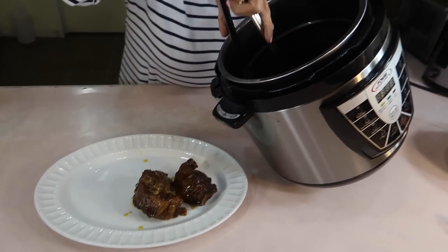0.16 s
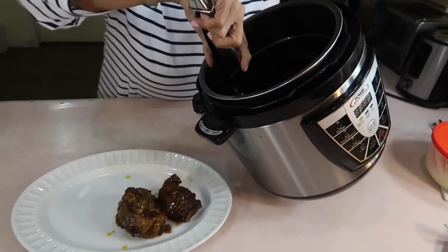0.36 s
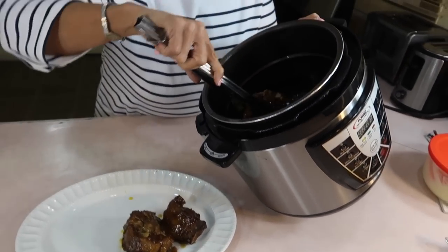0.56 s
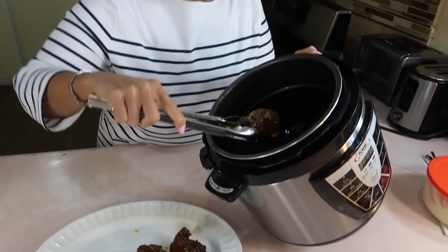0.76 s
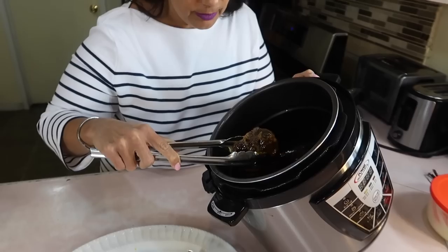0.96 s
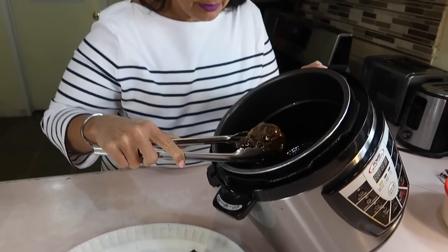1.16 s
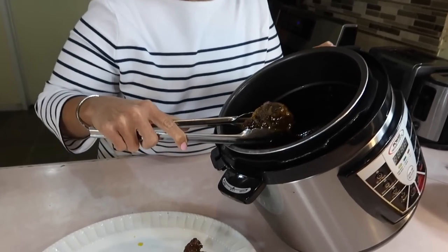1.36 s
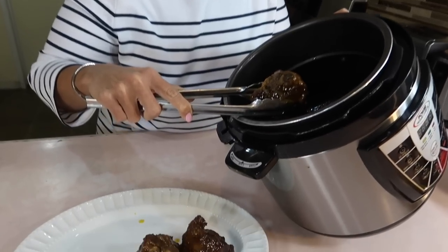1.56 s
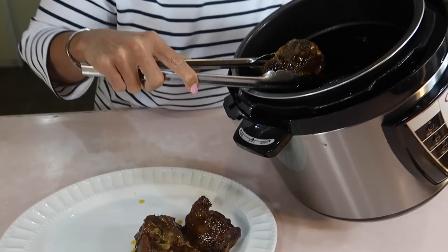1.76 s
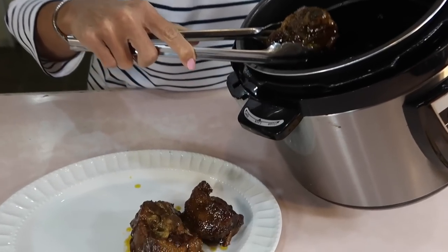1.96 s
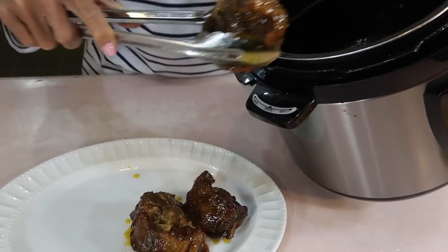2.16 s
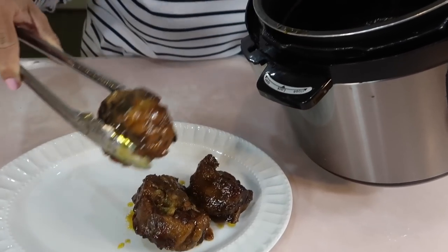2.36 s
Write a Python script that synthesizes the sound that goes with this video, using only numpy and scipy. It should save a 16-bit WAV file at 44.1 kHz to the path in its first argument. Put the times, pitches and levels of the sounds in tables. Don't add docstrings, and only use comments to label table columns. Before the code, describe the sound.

Metal tongs knock a steel cooking pot, a soft load thuds inside, then sauce drips faintly

```python
import sys
import numpy as np
from scipy import signal
from scipy.fft import rfft, irfft
from scipy.io import wavfile

SR = 44100
rng = np.random.default_rng(int(sys.argv[2]) if len(sys.argv) > 2 else 0)


def master_out(mix):
    frames = np.transpose(np.atleast_2d(mix))
    ceiling = np.clip(frames, -1, 1)
    pcm = np.round(ceiling * 32767).astype(np.int16)
    wavfile.write(sys.argv[1], SR, pcm)


def amplitude_ratio(level_db):
    exponent = np.asarray(level_db, float) / 20
    return 10 ** exponent


N = 105840

# frequency in Hz, level in dB per Hz.
RIM_CRACK = [(300, -7), (1200, -2.5), (2330, -2.5), (6470, -1), (9000, -12.5), (12500, -15), (15500, -35)]


def rms_one(x):
    return x / np.sqrt(np.mean(x ** 2) + 1e-20)


def dying(t60, size):
    return amplitude_ratio(-60 * np.arange(size) / SR / t60)


def swelling(t, rise_s):
    return 1 - np.exp(-t / rise_s)


def filtered(x, order, hz, kind="low"):
    return signal.sosfilt(signal.butter(order, hz, kind, fs=SR, output="sos"), x)


def coloured(x, spectrum):
    hz, db = np.transpose(spectrum)
    at = np.log(np.arange(len(x) // 2 + 1) * SR / len(x) + 1)
    return irfft(rfft(x) * amplitude_ratio(np.interp(at, np.log(hz), db)), len(x))


def add(out, sound, s):
    i = int(s * SR)
    out[i:i + len(sound)] += sound[:len(out) - i]


def pot_rings(modes, contact_s):
    rattle_depth, rattle_rate = 0.75, 0.05
    t = np.arange(SR // 2) / SR
    rings = np.zeros(len(t))
    for k, (hz, db, t60) in enumerate(modes):
        noise = rng.standard_normal(2 * len(t))
        rattle = rms_one(filtered(noise, 2, rattle_rate * hz)[len(t):])
        tone = (-1) ** k * np.sin(2 * np.pi * hz * t) * dying(t60, len(t))
        swell = swelling(t, contact_s * 500 / hz) ** 2
        rings += amplitude_ratio(db) * tone * (1 + rattle_depth * rattle) * swell
    return rings


def contact_crack(colour, crack_t60):
    spark_db, spark_t60_s, spark_hz = -37, 0.0065, 8000
    t = np.arange(SR // 2) / SR
    burst = rms_one(coloured(rng.standard_normal(len(t)), colour))
    burst = burst * dying(crack_t60, len(t)) * swelling(t, 0.00079)
    spark = filtered(rng.standard_normal(len(t)), 2, spark_hz, "high")
    duller_db = colour[-2][1] - RIM_CRACK[-2][1]
    return burst + amplitude_ratio(spark_db + duller_db) * spark * dying(spark_t60_s, len(t))


def knocks():
    # start in seconds, peak level in dB.
    blows = [
        (0.1606, -6.5),
        (0.3661, -10),
        (1.298, -11),
    ]
    # ring level in dB, contact time in seconds,
    # crack level in dB, crack's 60 dB decay in seconds, room level in dB.
    contacts = [(-10, 0.0068, -7.5, 0.033, -7.5), (-15.5, 0.0028, -10, 0.057, -9.5),
                (-11, 0.0022, -8.5, 0.042, -8)]
    # frequency in Hz, level in dB, 60 dB decay in seconds.
    rim_modes = [(338, -2.5, 0.083), (661.4, -1, 0.14), (1045, -11, 0.11), (1161, -14, .13),
                 (1385, -3.5, 0.14), (1880, -15, 0.15), (1978, -17, 0.3), (2095, -2.5, 0.054),
                 (2580, -14, 0.13), (2732, 0, 0.067), (3150, -9, 0.055), (3760, -16.5, 0.052),
                 (4220, -8, 0.055), (4960, -17.5, 0.14), (5600, -10, 0.038), (6500, 4.5, 0.025),
                 (7300, -7.5, 0.031)]
    thud_modes = [(349, 4, 0.1), (623, -14.5, 0.55), (680, 0, 0.12), (555, 0.5, 0.09), (825, -2, 0.039)]
    wall_modes = [(235, 3, 0.081), (294, -0.5, 0.088), (336, 0, 0.12), (598, -10.5, 0.13), (656.6, -7, 0.2),
                  (730, -19, 0.045), (1050, -10.5, 0.17), (1460, -11.5, 0.11), (1682, -11, 0.092),
                  (1949, -18, 0.17), (2097, -6, 0.063), (2320, -10, 0.12), (2360, -16, 0.2),
                  (2770, -4.5, 0.049), (3110, 3.5, 0.02), (3440, -9, 0.024), (4220, -34, 0.17)]
    # frequency in Hz, level in dB per Hz.
    thud_crack = [(200, -3), (600, -3.5), (1130, -14.5), (3000, -21), (12500, -41.5), (15500, -55)]
    wall_crack = [(300, -15), (900, -6.5), (1280, -17.5), (1630, -6.5), (3280, -8), (4390, -13.5),
                  (10500, -24), (14500, -47)]
    ring_to_room = 0.38
    bodies = [(rim_modes, RIM_CRACK), (thud_modes, thud_crack), (wall_modes, wall_crack)]
    direct, to_room = np.zeros(N), np.zeros(N)
    for (s, peak_db), (modes, colour), contact in zip(blows, bodies, contacts):
        ring_db, contact_s, crack_db, crack_t60, room_db = contact
        rings = amplitude_ratio(peak_db + ring_db) * pot_rings(modes, contact_s)
        crack = amplitude_ratio(peak_db + crack_db) * contact_crack(colour, crack_t60)
        add(direct, rings + crack, s)
        add(to_room, amplitude_ratio(room_db) * (ring_to_room * rings + crack), s)
    return direct, to_room


def settles():
    # start in seconds, frequency in Hz, level in dB, 60 dB decay in seconds.
    bumps = [
        (0.174, 80.6, -30.5, 0.33),
        (0.3697, 215, -1.5, 0.037),
        (0.389, 185, -17.5, 0.04),
        (0.419, 190.6, -24, 0.084),
        (0.437, 238, -27.5, 0.1),
    ]
    landing_s, floor_hz = 0.0037, 107
    out, t = np.zeros(N), np.arange(SR // 5) / SR
    for s, hz, db, t60 in bumps:
        bump = np.sin(2 * np.pi * hz * t) * dying(t60, len(t)) * swelling(t, landing_s)
        add(out, amplitude_ratio(db) * bump, s)
    return filtered(out, 2, floor_hz, "high")


def drops():
    # start in seconds, frequency in Hz,
    # level in dB, 60 dB decay in seconds.
    drop_rows = [(0.337, 470, -32, 0.034), (.661, 2200, -42, 0.018), (.885, 680, -42, 0.035),
                 (0.917, 4360, -47, 0.033), (0.939, 2990, -40, 0.04), (.949, 6340, -49, 0.042),
                 (1.044, 1600, -35, 0.04), (1.05, 1150, -38, 0.071), (1.059, 2905, -41.5, 0.085),
                 (1.064, 1243, -36.5, 0.048), (1.068, 5300, -51, 0.098), (1.085, 2320, -44, 0.05),
                 (1.085, 3400, -48, .04), (1.046, 2290, -44, 0.044), (1.047, 3280, -47, 0.053),
                 (1.149, 3000, -46, .04), (1.09, 1116, -40, 0.086), (1.098, 1305, -44.5, 0.086),
                 (1.115, 8000, -46, 0.053), (1.122, 3940, -43, 0.039), (1.122, 4800, -45, 0.041),
                 (1.149, 1740, -37.5, 0.032), (1.148, 2360, -37.5, 0.088), (1.170, 7670, -46, 0.036),
                 (1.172, 2080, -46, 0.06), (1.200, 2170, -48, 0.11), (1.240, 11550, -47, .015),
                 (1.248, 6150, -46, 0.043), (1.250, 2370, -57, 0.055), (1.394, 3630, -52, 0.03),
                 (1.520, 4810, -49.5, 0.048), (1.595, 6500, -38, 0.045), (1.616, 3245, -33.5, 0.025),
                  (1.628, 2870, -38.5, 0.042), (1.629, 4500, -43.5, 0.021), (1.655, 2760, -37, 0.037),
                  (1.685, 2550, -46, .04), (1.688, 3830, -41, 0.04), (1.697, 2400, -51, 0.054),
                  (1.698, 4530, -46.5, 0.038), (1.716, 3940, -50, 0.045), (1.737, 5080, -52.5, 0.033),
                  (1.800, 5750, -49.5, 0.03), (1.832, 2336, -49.5, 0.12), (1.972, 4400, -51, 0.027),
                  (1.98, 2850, -47.5, 0.053), (1.981, 4350, -51, 0.033), (2.017, 6930, -47, 0.051),
                  (2.048, 2600, -45.5, 0.061), (2.049, 3730, -47, 0.025), (2.053, 4220, -44, 0.064),
                  (2.076, 4240, -41, 0.052), (2.082, 3630, -48, 0.04), (2.079, 2600, -43, 0.067),
                  (2.085, 3000, -41, 0.055), (2.123, 2880, -44, 0.022), (2.122, 2440, -42.5, 0.028),
                  (2.145, 870, -39, 0.036), (2.004, 2650, -49, .04), (1.990, 2240, -51, .04),
                  (2.049, 3050, -53, .03), (2.085, 4720, -50, .04), (2.106, 1176, -54, 0.043),
                  (2.148, 260, -37, 0.049)]
    tone_share, splash_share = 0.5, 0.7
    pitch_rise, attack_s = 0.031, 0.00037
    width, grain = 0.09, 0.6
    out, t = np.zeros(N), np.arange(SR // 5) / SR
    for s, hz, db, t60 in drop_rows:
        bubble = np.sin(2 * np.pi * hz * (t + pitch_rise * t ** 2 / (2 * t60)))
        hiss, lumps = rng.standard_normal((2, len(t)))
        grit = hiss * np.exp(grain * lumps) / np.exp(grain ** 2)
        splash = filtered(grit, 2, [hz / (1 + width), hz * (1 + width)], "band")
        splash = splash / np.sqrt(hz * width * 4 / SR)
        plink = tone_share * bubble + splash_share * splash
        add(out, amplitude_ratio(db) * plink * dying(t60, len(t)) * swelling(t, attack_s), s)
    return out


def ticks():
    # start in seconds, centre in Hz, level in dB, 60 dB decay in seconds.
    puffs = [(0.336, 1000, -35, 0.035), (1.045, 3200, -40.5, 0.022), (1.594, 3280, -45, 0.033),
             (2.047, 3800, -45.5, 0.067), (2.078, 3300, -48.5, 0.068), (1.976, 2700, -54, .1),
             (1.616, 3200, -47, 0.062), (0.494, 3600, -45, 0.069), (0.878, 12900, -43, 0.014),
             (0.883, 13000, -41.5, 0.012), (0.948, 8100, -45, 0.012), (1.047, 7800, -45, 0.018),
             (1.057, 9000, -47.5, 0.024), (1.149, 2630, -41, 0.049), (1.115, 10000, -48, 0.017),
             (1.148, 6670, -52, 0.021), (1.247, 6860, -51, 0.077), (1.538, 10500, -47.5, 0.013),
             (1.594, 8900, -48, 0.032), (1.656, 7000, -43.5, 0.014), (1.667, 13000, -49, 0.018),
             (1.751, 12000, -47, 0.012), (2.035, 9250, -54.5, 0.056), (2.076, 6800, -52, 0.045)]
    span, size = 1.26, 4096
    out, t = np.zeros(N), np.arange(size) / SR
    for s, hz, db, t60 in puffs:
        band = [hz / span, min(hz * span, SR / 2.5)]
        puff = rms_one(filtered(rng.standard_normal(size), 1, band, "band"))
        add(out, amplitude_ratio(db) * puff * dying(t60, size) * swelling(t, 0.0027), s)
    return out


def creaks():
    # start in seconds, length in seconds, frequency in Hz, level in dB.
    creak_rows = [(1.048, .028, 1208, -53), (1.088, 0.034, 1120, -46), (1.087, 0.025, 2430, -50.5),
                  (1.123, 0.013, 3680, -47), (1.147, 0.019, 3800, -54), (1.178, .05, 2370, -54),
                  (1.165, 0.034, 2135, -53), (1.240, 0.044, 2480, -59), (1.661, 0.064, 2514, -58.5),
                  (1.389, 0.014, 3660, -48.5), (1.829, 0.019, 2407, -57.5), (2.056, 0.012, 2400, -57.5),
                  (2.075, 0.013, 3690, -45), (2.081, 0.023, 3480, -60), (2.083, .016, 2570, -49),
                  (2.128, 0.017, 2510, -48), (2.152, 0.016, 2500, -54)]
    edge_s, flutter_depth, flutter_hz = 0.004, 0.8, 110
    out, t = np.zeros(N), np.arange(SR // 8) / SR
    for s, length, hz, db in creak_rows:
        flutter = rms_one(filtered(rng.standard_normal(len(t)), 2, flutter_hz))
        held = swelling(t, edge_s) * np.exp(-np.maximum(t - length, 0) / edge_s)
        tone = np.sin(2 * np.pi * hz * t)
        add(out, amplitude_ratio(db) * held * (1 + flutter_depth * flutter) * tone, s)
    return out


def rustle():
    # time in seconds, level in dB.
    swing = [
        (1.88, -74.5),
        (1.97, -61.5),
        (2.03, -54.5),
        (2.11, -52),
        (2.18, -62),
        (2.299, -73),
    ]
    s, db = np.transpose(swing)
    cloth = rms_one(filtered(rng.standard_normal(N), 2, [670, 1410], "band"))
    return amplitude_ratio(np.interp(np.arange(N) / SR, s, db)) * cloth


def kitchen(x):
    t60_s, bright_t60_s, split_hz = 0.43, 0.11, 2960
    width, wide_from_hz = 0.96, 5900
    top_hz, gap_s = 9000, 0.0055
    size = SR
    mid, side = rng.standard_normal((2, size))
    side = filtered(side, 1, wide_from_hz, "high")
    noise = mid + width * side * np.array([[1], [-1]])
    low = filtered(noise, 1, split_hz)
    tail = low * dying(t60_s, size) + (noise - low) * dying(bright_t60_s, size)
    tail = filtered(tail, 2, top_hz) * swelling(np.arange(size) / SR, gap_s)
    tail = tail / np.sqrt(np.sum(tail ** 2) / 2)
    return signal.fftconvolve(x[None], tail, axes=1)[:, :N]


def room_air():
    # frequency in Hz, level in dB per Hz.
    shared_colour = [(25, -13), (100, -4.5), (300, -10), (1450, -21), (5000, -32), (10000, -42),
                     (13000, -46.5), (15500, -53)]
    side_colour = [(25, -42), (209, -10), (500, -12), (1570, -18.5), (5000, -24.5), (10000, -37),
                   (13000, -38.5), (15500, -49)]
    shared = amplitude_ratio(-50.5) * rms_one(coloured(rng.standard_normal(N), shared_colour))
    side = amplitude_ratio(-55) * rms_one(coloured(rng.standard_normal(N), side_colour))
    return shared + side * np.array([[1], [-1]])


def hum():
    # frequency in Hz, width in Hz, level in dB.
    hum_lines = [(51, 5.6, -61), (84.2, 5.3, -56), (121, 7.5, -59.5), (235, 5.5, -60.5), (474, 4.9, -65)]
    hz_axis, out = np.arange(N // 2 + 1) * SR / N, np.zeros(N)
    for hz, width, db in hum_lines:
        resonance = 1 / (1 + ((hz_axis - hz) / width) ** 2)
        out += amplitude_ratio(db) * rms_one(irfft(rfft(rng.standard_normal(N)) * resonance, N))
    return out


def to_two_ears(x):
    lag_s, pan_db = 0.000018, 0.18
    hz_axis = np.arange(N // 2 + 1) * SR / N
    late = irfft(rfft(x) * np.exp(-2j * np.pi * hz_axis * lag_s), N)
    return np.array([late, x]) * amplitude_ratio(np.array([[-pan_db], [pan_db]]))


def scene():
    knock, knock_to_room = knocks()
    wet = drops() + ticks() + creaks()
    near = to_two_ears(knock + settles() + wet)
    echoes = kitchen(knock_to_room + amplitude_ratio(-10.5) * wet)
    return near + echoes + rustle() + room_air() + hum()


def roll_off(x):
    return signal.sosfilt(signal.butter(12, 15640, fs=SR, output="sos"), x)


def record(dry):
    cut = signal.sosfilt(signal.cheby2(16, 50, 15900, fs=SR, output="sos"), dry)
    return roll_off(cut)


dry = scene()
out = record(dry)
master_out(out)
```